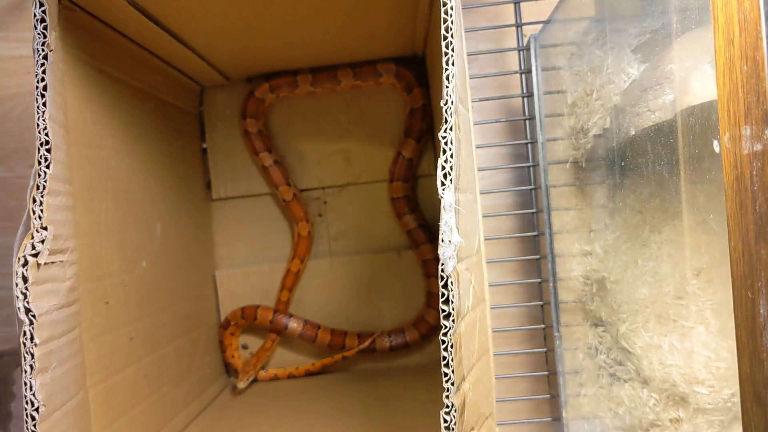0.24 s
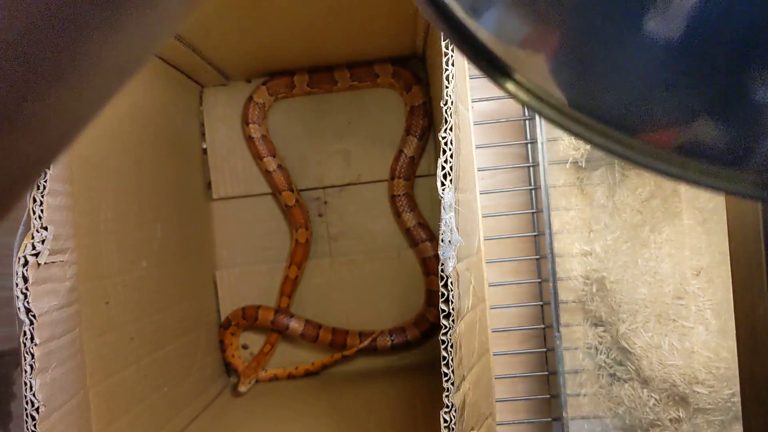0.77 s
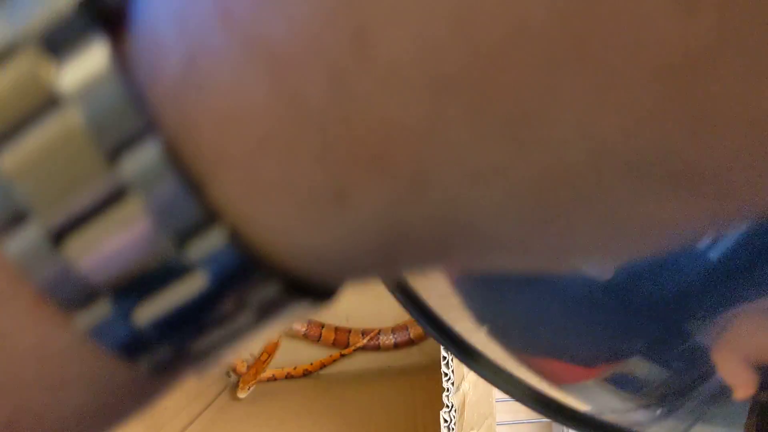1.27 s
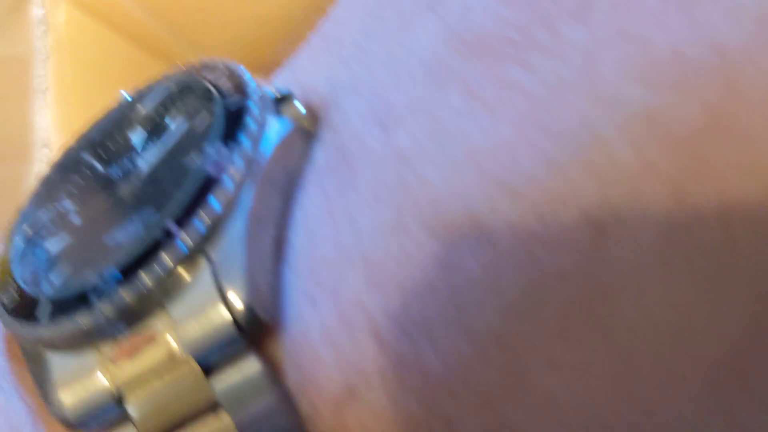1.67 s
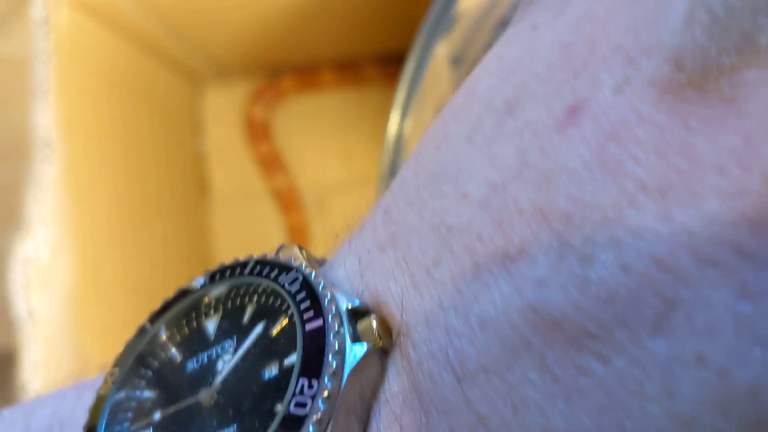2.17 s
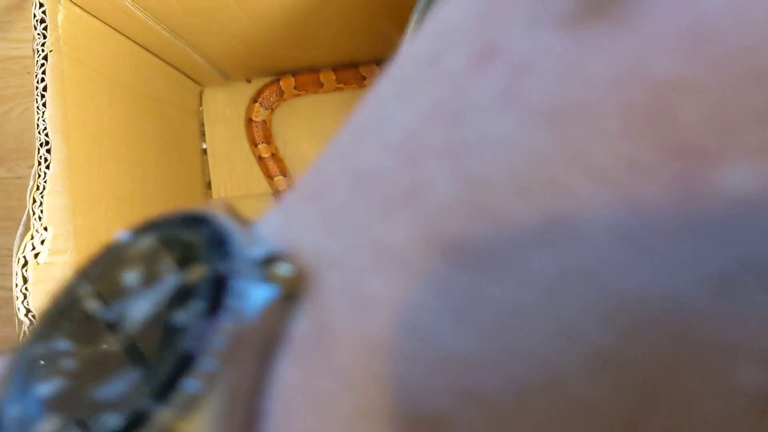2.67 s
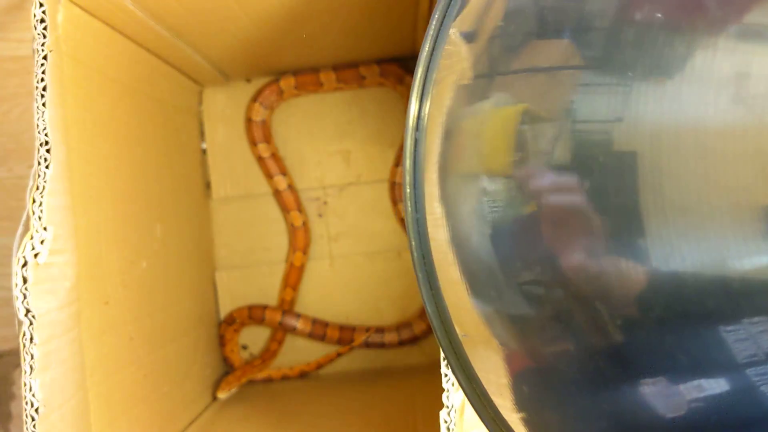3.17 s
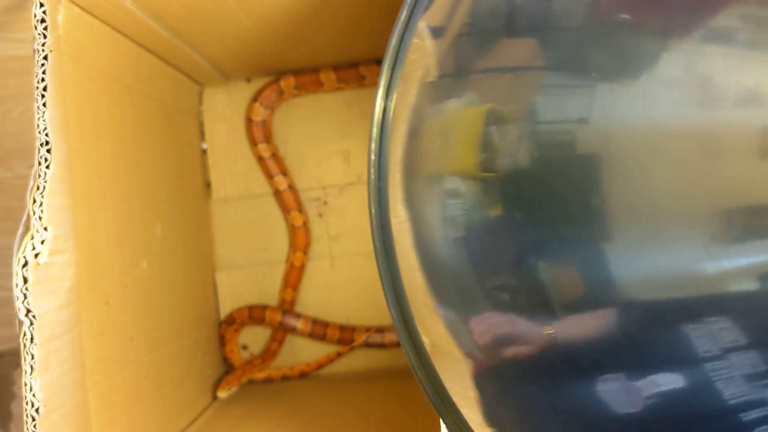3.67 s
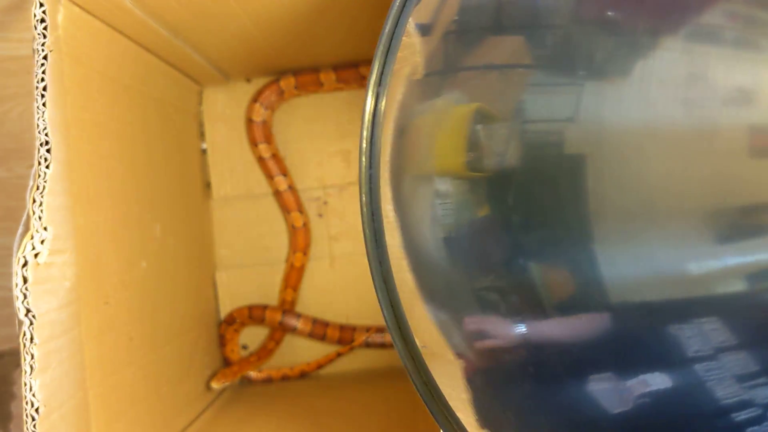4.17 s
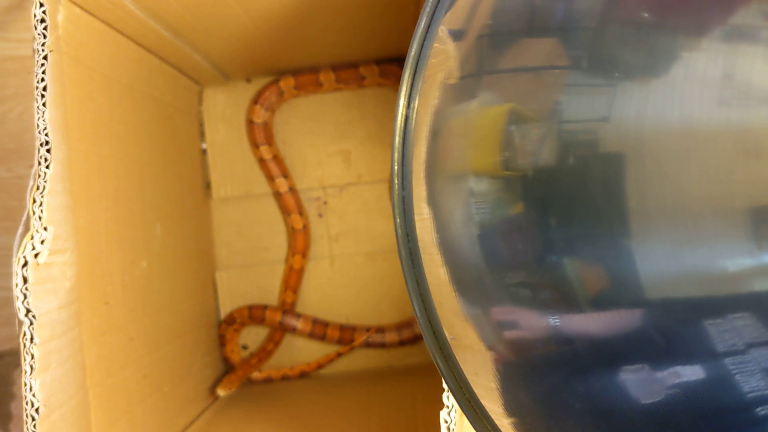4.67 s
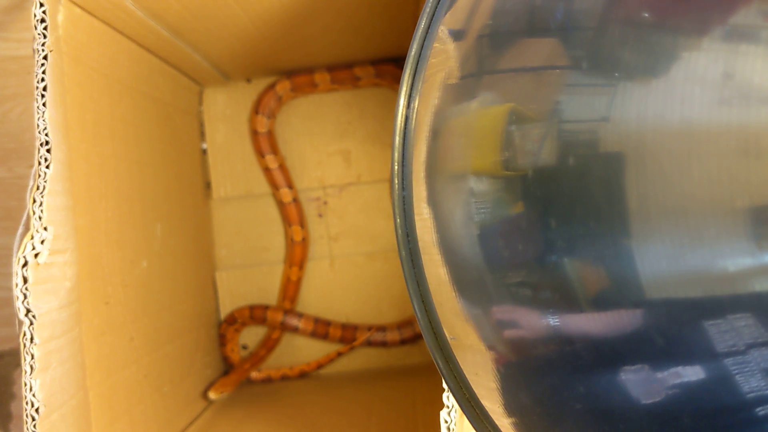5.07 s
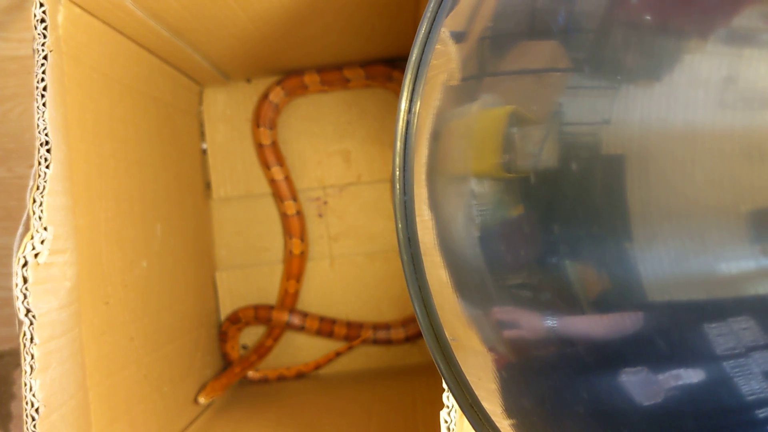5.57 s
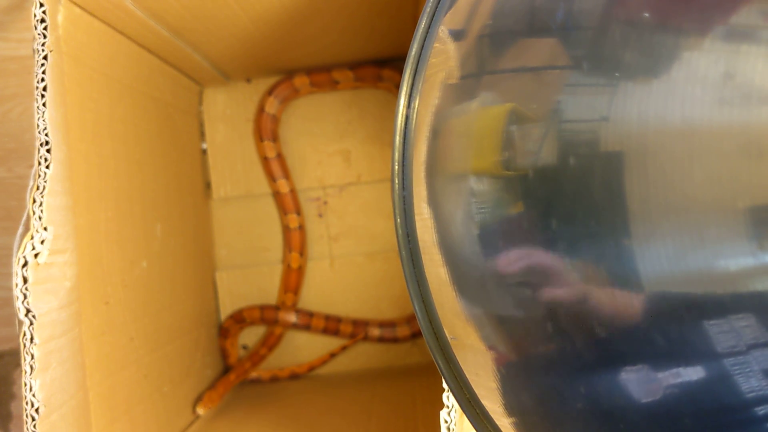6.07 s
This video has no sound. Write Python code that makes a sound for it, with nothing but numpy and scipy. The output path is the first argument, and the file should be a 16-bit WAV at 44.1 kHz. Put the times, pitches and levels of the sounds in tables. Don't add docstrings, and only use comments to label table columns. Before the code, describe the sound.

Stereo close microphone, short boxy echo, faint room noise. Busy, uneven scratching on metal mixes with soft thuds on cardboard and thin, partly hoarse rodent squeaks. A loud blow with clatter comes early, a second sharp one soon after, then a faint bump. The squeaking stops; scattered knocks and rubs thin almost to quiet before a few final scuffs and another cluster of squeaks.

```python
import sys
import numpy as np
from scipy import signal
from scipy.fft import rfft, irfft, next_fast_len
from scipy.io import wavfile

SR = 44100
rng = np.random.default_rng(int(sys.argv[2]) if len(sys.argv) > 2 else 0)


def store_wav(level_fs):
    pcm = np.round(np.clip(np.atleast_2d(level_fs), -1, 1) * 32767)
    wavfile.write(sys.argv[1], SR, pcm.T.astype(np.int16))


def ratio_of_db(decibels):
    return 10 ** (np.asarray(decibels, float) / 20)


N = 279153
T = np.arange(N) / SR

# (frequency [Hz], density [dB per Hz])
ROOM_SPECTRUM = [(15, -63), (30, -25.5), (60, -0.5), (130, 10), (249, -11.5), (344, -8.5), (560, -17),
                 (988, -25), (1400, -8.5), (1520, -15), (4490, -13), (9000, -30.5), (16000, -28)]
ROOM_DB = -60
# (frequency [Hz], density [dB per Hz])
BOOM_SPECTRUM = [(15, -69.5), (25, -44), (64, -10), (97, -9.5), (150, -9), (369, -25), (420, -14),
                 (550, -27), (920, -120)]
# (frequency [Hz], density [dB per Hz])
RUSTLE_SPECTRUM = [(160, -25), (280, -15), (379, -15), (549, -12.5), (885, -6), (1250, -15), (1530, -15),
                   (4500, -32), (5850, -75), (9900, -120)]
# (frequency [Hz], density [dB per Hz])
HISS_SPECTRUM = [(1180, -16), (2000, 2.5), (2280, -1), (2620, -5), (4230, -4.5), (5780, -7.5), (6530, -8),
                 (7250, -5.5), (8800, -12), (11200, -16), (15100, -22), (16000, -30.5)]
# (frequency [Hz], correlation [-1 to 1])
LIKENESS = [(60, 0.82), (200, 0.96), (600, 0.65), (1600, 0.14), (5000, 0.052), (15000, 0.099)]
# (frequency [Hz], left minus right [dB])
LEAN = [(60, 5), (180, 2.5), (550, 2), (1650, 1), (4970, 0), (15000, 14.5)]
RIGHT_LAG_S = .00011

# (time [s], held [s], effort [dB], weight on the box [dB], claws out [dB])
BOUTS = [(0.016, 0.03, -36, 1, -18.5), (.14, 0.22, -53.5, 0, -15), (0.33, 0.031, -41.5, 1.5, -19.5),
         (.44, 0.2, -56.5, 16.5, -15), (.66, 0.25, -54.5, 7.5, -11), (.98, 0.027, -43.5, 4, -14),
         (1.073, 0.038, -38.5, 10, -20), (1.346, 0.0039, -51, 17, 4.5), (1.52, .45, -37, -4.5, -17),
         (2.019, 0.038, -27.5, -8.5, -27), (2.171, 0.11, -40, -7, -15.5), (2.33, 0.05, -45, -1.5, -15),
         (2.523, 0.34, -44.5, -1, -17.5), (2.76, 0.04, -54, -7, -5.5), (2.86, 0.015, -40, 5.5, -48),
         (3.022, 0.074, -42.5, 0, -19.5), (3.16, .12, -57.5, 10, -15.5), (3.461, 0.13, -49, -4.5, -19),
         (3.566, 0.072, -47.5, -1.5, -16), (3.761, 0.078, -43, -1.5, -16), (4.198, 0.077, -53, 4.5, -17),
         (4.27, .02, -48, 1, -19.5), (4.33, 0.059, -45.5, -2.5, -15), (4.45, 0.076, -59, 6.5, -18.5),
         (4.58, .04, -50.5, -5, -18), (4.645, 0.025, -46, 6.5, -24), (5.329, 0.014, -64.5, -5, -11),
         (5.855, 0.038, -44, 5.5, -36.5), (5.98, 0.31, -70, 10, -8)]
BUILD_DB_PER_S, SUDDEN_S = 159, 0.05
BOOM_FADE_DB_PER_S, RUSTLE_FADE_DB_PER_S, HISS_FADE_DB_PER_S = 89, 128, 228
REST_DB = [-59.5, -66.5, -82]
# (frequency [Hz], width [Hz], level [dB])
BODY_RINGS = [(156, 1.3, -2), (221.5, 85.4, 5), (330, 3.4, 3.5), (537.5, 77, 7.5), (629, 25, 2),
              (1025, 14, 1), (1240, 127, 3), (1374, 19, -0.5), (2300, 34, 3)]
# (frequency [Hz], width [Hz], level [dB])
STEEL_SHEEN = [(2300, 200, -5.5), (6600, 300, -4), (7150, 350, 2.5), (8600, 600, -2.5), (9370, 300, 0.5)]

# (time [s], length [s], frequency [Hz], width [Hz], level [dB])
RUBS = [(0.573, 0.04, 2280, 300, -52.5), (1.501, 0.19, 1215, 290, -48), (1.759, 0.068, 564, 86, -46.5),
        (2.247, 0.042, 2490, 280, -49.5), (2.524, 0.39, 1346, 180, -55.5), (3.502, 0.56, 330, 27.8, -55),
        (2.9, 0.095, 565, 190, -59), (3.62, 0.17, 522, 56, -54.5), (3.738, 0.15, 538, 193, -42),
        (3.741, 0.035, 2250, 170, -66), (3.565, 0.021, 1240, 120, -56), (3.07, 0.041, 600, 160, -48.5),
        (4.19, 0.035, 627, 90, -57.5), (4.244, 0.037, 617, 90, -47.5), (4.569, 0.059, 620, 140, -55),
        (4.83, 0.14, 4630, 650, -69.5), (5.71, 0.053, 3200, 740, -53), (5.823, 0.073, 2590, 300, -76),
        (6.142, 0.052, 256, 40, -55.5), (.16, 0.13, 2280, 250, -62.5), (0.651, 0.24, 2350, 160, -68.5),
        (3.951, 0.14, 380, 250, -63.5), (5.997, 0.19, 640, 530, -76.5), (6.056, 0.035, 2490, 250, -63.5),
        (6.157, 0.04, 2506, 168, -64), (5.498, 0.022, 480, 100, -64), (5.598, 0.025, 540, 120, -70)]
# (time [s], peak [dB], t60 [s], low edge [Hz], high edge [Hz])
SCRATCHES = [(1.076, -35, 0.17, 8900, 15500), (2.4, -17, 0.01, 6300, 8800), (3.1, -44, .08, 10500, 19000),
             (2.997, -58, 0.12, 4100, 7000), (2.6, -35, 0.14, 5000, 9000), (2.5, -43, .2, 11500, 17000),
             (5.83, -50, 0.22, 12400, 13600), (2.53, -44, .1, 12400, 15000), (.01, -44, .1, 2500, 7600),
             (2.48, -48, .04, 14500, 15800), (6.145, -42, .12, 10500, 13000),
             (6.045, -48, .12, 10800, 12500), (5.68, -37, 0.077, 740, 1600), (5.82, -54, .12, 3800, 6000),
             (5.72, -54, .12, 3500, 6000), (0.52, -46, .1, 2300, 4200), (1.33, -41, .06, 1800, 4000),
             (1.36, -41.5, 0.054, 1500, 3500)]
# (time [s], peak [dB], t60 [s])
TICKS = [(1.074, -23, 0.45), (1.2211, -37, 0.062), (1.324, -26, 0.043), (1.3426, -4, 0.031),
         (1.344, -26, 0.072), (1.359, -36, 0.04), (2.001, -3, 0.032), (2.444, -24, .03),
         (2.455, -29, 0.027), (3.039, -25.5, 0.13), (3.568, -33, .14), (3.786, -32, 0.2),
         (4.639, -27.5, 0.079), (4.7351, -36, 0.056), (5.5766, -43.5, 0.081), (5.716, -36.5, 0.26),
         (6.322, -40, 0.058), (.01, -27, 0.074), (0.348, -40, .04), (.38, -40, .04), (.4, -37, .03),
         (5.321, -50, .06)]
# (time [s], peak [dB], knock
# [Hz], thud [dB])
KNOCKS = [(0.004, -21.5, 553, -36.5), (0.347, -23.5, 676, -58), (0.379, -26, 560, -59),
          (0.743, -33, 460, -44), (0.971, -29.5, 590, -51), (1.068, -24, 635, -35.5),
          (1.323, -32, 1520, -46.5), (1.341, -25, 750, -60), (1.358, -22.5, 710, -62),
          (1.918, -25.5, 490, -51), (1.995, -16, 570, -42), (3.011, -27.5, 580, -47.5),
          (3.041, -30, 596, -51), (1.465, -22.5, 1300, -60), (1.497, -26.5, 1240, -60),
          (2.896, -35.5, 560, -55), (3.745, -39, 557, -58), (3.795, -36, 528, -44), (3.815, -35, 530, -48),
          (4.194, -47, 614, -59), (4.251, -46, 620, -56), (4.341, -35.5, 637, -66), (4.566, -43, 624, -65),
          (.309, -39, 750, -70), (.4, -40, 560, -66), (2.393, -39.5, 660, -60), (2.547, -33.5, 624, -70),
          (6.322, -51, 497, -46), (4.639, -28.5, 487, -43.5), (5.321, -43, 565, -50.5),
          (5.511, -51, 470, -64.5), (5.678, -33, 570, -38), (5.818, -23.5, 510, -41.5),
          (5.835, -26, 513, -46)]
THUD_HZ, THUD_PEAK_S, REBOUND_S, REBOUND_DB = 242, .013, .04, -12.5

# (time [s], rise [s], frequency [Hz], level [dB], t60 [s])
SWELLS = [
    (1.076, 0.011, 184.5, -26.5, 0.16),
    (1.097, 0.03, 156, -18, 0.29),
    (1.341, 0.016, 175.8, -26, 0.14),
    (1.348, 0.021, 76, -40, 0.55),
    (1.513, 0.017, 135.6, -37, 0.12),
    (1.86, 0.04, 145, -34.5, 0.19),
]
# (time [s], peak [dB], crack [dB], clatter [dB], clatter t60 [s])
BUMPS = [
    (1.4497, -7.5, -8.5, -25.5, 0.27),
    (2.0055, -13.5, -8, -21.5, 0.14),
    (2.838, -29, -30.5, -32, 0.039),
]
LEAD_IN_S = [0.0019, 0.0035, 0.001]
SNAPS_DB = [-22, -10, -34]
BOWL_HZ = [190, 250, 435, 536, 577, 730, 850, 1010, 1235, 1370, 1750]
# (t60 [s], level in first, second, third bump [dB])
BOWL_MODES = [(0.6, -27.5, -27.5, -13), (0.11, -27, -23, -3), (0.05, -38, -15, -22), (0.15, -4, -9, -2),
              (0.14, -5.5, -13, -10), (0.097, -20, -10, -2), (0.12, -23, -24, -17), (0.24, -25.5, -13, -24),
              (0.071, -14.5, -18.5, -6), (0.046, -13.5, -9, -1.5), (0.016, -14.5, -13.5, -15)]
# (time [s], left minus right [dB])
PLACE = [(0, 5), (.5, 1.5), (1.1, 5), (1.45, 4), (1.9, 5), (2.0, 0), (2.3, 0), (2.84, 2), (3.8, 4.5),
         (4.6, 0.5), (5.7, -0.5), (6.3, -0.5)]

# (time [s], length [s], pitch [Hz], 3rd harmonic [dB], 4th harmonic [dB])
CLEAR_SQUEAKS = [(0.571, 0.054, 2610, -45, -44), (0.585, 0.025, 2440, -37, -40),
                 (0.644, 0.028, 2356, -71, -35.5), (0.937, 0.024, 2300, -81, -38.5),
                 (1.45, 0.025, 2495, -35, -65), (1.479, 0.021, 2420, -28.5, -54),
                 (0.637, 0.09, 2585, -62, -48), (5.94, .05, 2660, -70, -48),
                 (1.504, 0.07, 2614, -45, -33.5), (1.558, .09, 2670, -42, -60),
                 (1.612, 0.024, 2616, -55, -39), (1.658, 0.016, 2208, -26, -24.5),
                 (1.79, 0.022, 2053, -36, -57), (1.804, 0.03, 2636, -53, -29),
                 (2.254, 0.017, 2640, -25, -64), (2.242, 0.026, 2602, -58, -27.5),
                 (2.276, 0.034, 2620, -53, -36), (2.349, 0.028, 2630, -64, -33),
                 (2.392, 0.045, 2630, -67, -53), (2.428, 0.026, 2380, -76, -22.5),
                 (2.465, 0.025, 2375, -79, -42), (2.523, 0.045, 2160, -34.5, -47),
                 (2.594, 0.015, 2326, -63, -29), (2.738, 0.046, 2620, -55, -46.5),
                 (2.576, .008, 2215, -72.5, -41), (0.845, 0.012, 2285, -70, -36.5),
                 (6.073, .012, 2197, -60, -37.5), (3.571, 0.027, 1238, -47, -85),
                 (5.797, 0.052, 2617, -33, -48), (5.846, 0.062, 2600, -47, -27.5),
                 (5.925, 0.022, 2375, -77, -29), (5.984, 0.025, 2157, -68, -27.5),
                 (6.063, .015, 2230, -58, -38), (6.173, 0.03, 2652, -62.5, -36.5),
                 (2.588, 0.016, 2310, -46, -60), (2.7, .03, 2064, -43, -70)]
# (time [s], length [s], pitch [Hz], 3rd harmonic [dB], 4th harmonic [dB])
ROUGH_SQUEAKS = [(0.057, 0.012, 2023, -27.5, -84), (0.593, 0.0084, 1703, -28, -77),
                 (0.7, 0.14, 2600, -42, -68.5), (0.761, 0.035, 2130, -65, -42),
                 (1.73, 0.042, 2550, -44, -70), (2.459, 0.034, 2150, -67, -41.5),
                 (2.48, 0.029, 2652, -45, -73), (0.559, 0.039, 2575, -33.5, -57),
                 (.651, 0.042, 2570, -69, -38.5), (.73, 0.024, 2230, -31, -69),
                 (0.803, 0.035, 2340, -68, -28), (0.905, 0.025, 1967, -38.5, -73),
                 (1.505, 0.048, 2590, -34, -54.5), (1.686, 0.044, 1945, -30.5, -68),
                 (2.51, 0.045, 1930, -42, -57), (2.625, 0.035, 2360, -62, -46),
                 (2.697, 0.014, 2040, -30.5, -76), (5.999, 0.028, 2610, -36, -55),
                 (6.021, 0.047, 1950, -35.5, -58), (6.072, 0.029, 2300, -51.5, -36),
                 (6.138, 0.036, 2000, -37, -68.5), (6.01, 0.045, 2170, -41, -60),
                 (6.158, 0.03, 2265, -53, -36.5)]
# (frequency [Hz], level [dB])
SIXTH = [(11000, -8), (11800, -11.5), (13000, -29.5), (14500, 5.5), (15800, -8.5)]
# (time [s], length [s], mouth resonance [Hz], mouth [dB], top [dB])
RASPS = [(0.576, 0.027, 8080, -39, -41.5), (0.621, 0.068, 9500, -48.5, -68), (0.73, 0.076, 7530, -38, -42),
         (1.526, 0.051, 8000, -39, -61), (1.67, 0.096, 7430, -35.5, -41), (2.252, 0.07, 8030, -67, -59),
         (2.477, 0.055, 8240, -54, -71), (2.526, 0.041, 11350, -61, -54), (1.561, 0.12, 7880, -40, -69),
         (1.77, 0.22, 7550, -37.5, -58.5), (2.573, 0.136, 8600, -46, -61.5),
         (5.716, 0.13, 8200, -53.5, -56), (5.816, 0.045, 7840, -48, -59.5), (5.928, 0.023, 9000, -54, -70),
         (6.014, 0.066, 7350, -42.5, -54), (6.129, 0.05, 7400, -49, -58)]
# (frequency [Hz], width [Hz], depth [0 to 1])
PORT_DIPS = [
    (5700, 1500, 1),
    (9560, 950, 1),
]


def rms_one(x):
    return x / np.sqrt(np.mean(x ** 2) + 1e-20)


def at_hz(points, hz):
    known_hz, values = np.transpose(points)
    return np.interp(np.log(hz), np.log(known_hz), values)


def band(x, low_hz, high_hz):
    edges = [low_hz, min(high_hz, .45 * SR)]
    return signal.sosfilt(signal.butter(2, edges, "band", fs=SR, output="sos"), x)


def resonate(x, hz, width_hz):
    r = np.exp(-np.pi * width_hz / SR)
    zeros = np.array([1, 0, -1]) * (1 - r * r) / 2
    return signal.lfilter(zeros, [1, -2 * r * np.cos(2 * np.pi * hz / SR), r * r], x)


def drift(rate, size=N):
    steps = rng.standard_normal(int(N * 40 / SR) + 400)
    return np.interp(np.arange(size) * rate / SR, np.arange(len(steps)), steps)


def add(out, x, s):
    i = round(s * SR)
    out[..., i:i + x.shape[-1]] += x[..., :N - i]


def dying(t, t60):
    return ratio_of_db(-60 * t / t60)


def spread(spectrum, grains_per_s=0., grain_db=0., share=0.):
    white = rng.standard_normal((2, N))
    sizes = ratio_of_db(grain_db * np.minimum(rng.exponential(1, N), 4)) * rng.choice([-1, 1], N)
    hits = sizes ** 2 * (rng.random(N) < grains_per_s / SR)
    contacts = rms_one(signal.lfilter([1], [1, -.97], hits) ** .5)
    size = next_fast_len(N)
    hz = np.maximum(np.arange(size // 2 + 1) * SR / size, 1)
    mid, side = rfft(white * (1 + share * contacts), size) * ratio_of_db(at_hz(spectrum, hz))
    alike, lean = at_hz(LIKENESS, hz), ratio_of_db(at_hz(LEAN, hz) / 2)
    pair = np.sqrt(1 + alike) * mid + np.sqrt(1 - alike) * side * [[1], [-1]]
    late = np.exp(-2j * np.pi * hz * RIGHT_LAG_S)
    return rms_one(irfft(pair * [lean, late / lean], size)[:, :N])


def room_floor():
    return ratio_of_db(ROOM_DB) * spread(ROOM_SPECTRUM)


def box_echo(x, t60, wet_db, shared):
    t = T[:SR // 3]
    own, common = rng.standard_normal((2, len(t))), rng.standard_normal(len(t))
    tail = (own + shared * common) * dying(t, t60) * (t > .004)
    tail = tail / np.sqrt((tail ** 2).sum(axis=1, keepdims=True))
    return ratio_of_db(wet_db) * signal.fftconvolve(x[None], tail, axes=1)[:, :N]


def stirring(extra_db, fade_db_per_s, rest_db):
    s, held, effort_db = np.transpose(BOUTS)[:3, :, None]
    t = T[::32]
    build = BUILD_DB_PER_S * (1 + SUDDEN_S / np.maximum(held, .005))
    loss = build * np.maximum(s - t, 0) + fade_db_per_s * np.maximum(t - s - held, 0)
    bouts = ratio_of_db(2 * (effort_db + extra_db[:, None] - loss))
    return np.interp(T, t, np.sqrt(ratio_of_db(2 * rest_db) + bouts.sum(axis=0)))


def scrabbling():
    *_, weight_db, claws_db = np.transpose(BOUTS)
    boom = stirring(weight_db, BOOM_FADE_DB_PER_S, REST_DB[0])
    boom = boom * ratio_of_db(-3.5 + 2.0 * drift(25)) * spread(BOOM_SPECTRUM)
    rustle = stirring(0 * weight_db, RUSTLE_FADE_DB_PER_S, REST_DB[1])
    rustle = rustle * ratio_of_db(1.5 * drift(30)) * spread(RUSTLE_SPECTRUM, 400., 2., .25)
    body = boom + ratio_of_db(-2.5) * rustle
    rings = sum(ratio_of_db(db + 4 * drift(5)) * resonate(body, hz, w) for hz, w, db in BODY_RINGS)
    hiss = stirring(claws_db, HISS_FADE_DB_PER_S, REST_DB[2])
    hiss = hiss * ratio_of_db(1.5 * drift(20)) * spread(HISS_SPECTRUM, 350., 3., .6)
    sheen = sum(ratio_of_db(db + 3 * drift(9.4)) * resonate(hiss, hz, w) for hz, w, db in STEEL_SHEEN)
    return ratio_of_db(-11.5) * body + ratio_of_db(-1.0) * rings + ratio_of_db(8.5) * (0.77 * hiss + sheen)


def rubs():
    out = np.zeros(N)
    for s, length, hz, width_hz, db in RUBS:
        size = round(length * SR) + 800
        sung = resonate(resonate(rng.standard_normal(size), hz, width_hz), hz, width_hz)
        add(out, ratio_of_db(db) * rms_one(sung) * signal.windows.tukey(size, .6), s)
    return out


def scratches():
    out, t = np.zeros(N), T[:SR // 5]
    for s, db, t60, low_hz, high_hz in SCRATCHES:
        slip = rng.standard_normal(len(t)) * dying(t, t60) * np.minimum(t / .0012, 1)
        add(out, ratio_of_db(db) * band(band(slip, low_hz, high_hz), low_hz, high_hz), s)
    return out


def claw_ticks():
    out, t = np.zeros(N), T[:SR // 5]
    for s, db, t60 in TICKS:
        blow = rng.standard_normal(len(t)) * dying(t, t60)
        add(out, ratio_of_db(db - 18.0) * band(blow, 2100.0, 10500.0), s)
    return out


def soft_knocks():
    out, t = np.zeros(N), T[:SR // 5]
    rise, again = t / THUD_PEAK_S, np.maximum(t - REBOUND_S, 0) / THUD_PEAK_S
    press = (rise * np.exp(1 - rise)) ** 2 - ratio_of_db(REBOUND_DB) * again * np.exp(1 - again)
    thud = np.sin(2 * np.pi * THUD_HZ * t) * press
    for s, db, hz, thud_db in KNOCKS:
        rough = rng.standard_normal(len(t)) * dying(t, 0.097) * np.minimum(t / 0.003, 1)
        push = rough + 1.5 * np.minimum(t / .001, 1) * dying(t, 0.006)
        knock = resonate(push, hz, 140.0) + 0.079 * band(push, 300., 6100.0)
        knock = band(knock, 58.0, 3900.0)
        add(out, ratio_of_db(db - 5.0) * knock / np.abs(knock).max() + ratio_of_db(thud_db + 4.5) * thud, s)
    return out


def wall_swells():
    out, t = np.zeros(N), T[:SR // 2]
    for s, rise, hz, db, t60 in SWELLS:
        swell = np.sin(np.pi / 2 * np.minimum(t / rise, 1)) ** 2
        fade = dying(np.maximum(t - rise, 0), t60)
        add(out, ratio_of_db(db) * np.sin(2 * np.pi * hz * t) * swell * fade, s)
    return out


def bowl_bumps():
    out, since = np.zeros(N), T[:SR // 2] - .02
    late = np.maximum(since, 0)
    phases = rng.uniform(-.7, .7, (len(BUMPS), len(BOWL_MODES)))
    for k, (s, db, crack_db, clatter_db, t60) in enumerate(BUMPS):
        noise = rng.standard_normal(len(since))
        swell = np.exp(np.minimum(since, 0) / LEAD_IN_S[k])
        rings = 0
        for hz, mode, phase in zip(BOWL_HZ, BOWL_MODES, phases[k]):
            ring = ratio_of_db(mode[1 + k]) * np.cos(2 * np.pi * hz * since + phase) * dying(late, mode[0])
            flutter_db = 4.9 * (hz > 600) * np.minimum(late / 0.014, 1)
            rings = rings + ring * ratio_of_db(flutter_db * drift(70., size=len(since)))
        crack = band(noise * (since > 0) * dying(late, 0.024), 3500.0, 7400.0)
        clatter = band(noise * swell * dying(late, t60), 130.0, 2400.0)
        snap = band(np.exp(-(since / 0.0001) ** 2), 120., 4000.)
        blow = ratio_of_db(SNAPS_DB[k] + 3) * snap + ratio_of_db(db) * swell * rings
        add(out, blow + ratio_of_db(crack_db) * crack + ratio_of_db(clatter_db + 8) * clatter, s - .02)
    return out


def breath_shape(t, length):
    held = dying(np.minimum(t, length), 0.56)
    return np.minimum(t / 0.009, 1) * dying(np.maximum(t - length, 0), 0.054) * held


def squeak(row, jitter, scoop):
    _, length, hz, third_db, fourth_db = row
    sixth_db = third_db + at_hz(SIXTH, hz * 6)
    t = T[:SR // 5]
    waver = 1 + 0.0034 * drift(60., size=len(t)) + jitter * drift(840.0, size=len(t))
    waver = waver - scoop * np.exp(-t / 0.012)
    phase = 2 * np.pi * np.cumsum(hz * waver) / SR
    fifth_db = max(fourth_db, sixth_db) - 37.5
    levels_db = [third_db - 28.0, third_db - 26.0, third_db, fourth_db, fifth_db, sixth_db]
    voice = 0
    for k, db in enumerate(levels_db, 1):
        flutter_db = 5.2 * drift(90., size=len(t)) + 1.4 * drift(300., size=len(t))
        voice = voice + ratio_of_db(db - 5.0 + flutter_db) * np.sin(k * phase)
    return voice * breath_shape(t, length)


def rasp(length, hz, db, top_db):
    t = T[:SR // 5]
    noise = rng.standard_normal(len(t)) * ratio_of_db(4.6 * drift(150., size=len(t)))
    mouth = band(band(noise, hz * 0.74, hz * 1.22), hz * 0.74, hz * 1.22)
    mouth = mouth + 1.3 * sum(resonate(mouth, hz * f, 120.) for f in rng.uniform(.75, 1.2, 4))
    top = band(band(noise, 11990.0, 17500.), 12040.0, 17500.)
    return (ratio_of_db(db + 4.0) * mouth + ratio_of_db(top_db + 2.5) * top) * breath_shape(t, length)


def rat():
    out = np.zeros(N)
    for row in CLEAR_SQUEAKS:
        add(out, squeak(row, jitter=.005, scoop=.008), row[0])
    for row in ROUGH_SQUEAKS:
        add(out, squeak(row, jitter=.013, scoop=.035), row[0])
    for s, *settings in RASPS:
        add(out, rasp(*settings), s)
    return out


def ports(x):
    left, right = [x - depth * resonate(x, hz, w) for hz, w, depth in PORT_DIPS]
    return np.array([ratio_of_db(7.0) * left, ratio_of_db(-5.0) * np.roll(right, 3)])


def scene():
    small = soft_knocks() + claw_ticks() + rubs() + scratches()
    bowl, voice = bowl_bumps() + wall_swells(), rat()
    blows = small + bowl
    lean = ratio_of_db(np.interp(T, *np.transpose(PLACE)) / 2)
    right_blows = np.roll(blows, round(RIGHT_LAG_S * SR))
    near = ports(voice) + np.array([ratio_of_db(3.5) * lean * blows, ratio_of_db(2.5) / lean * right_blows])
    echo = box_echo(small + ratio_of_db(-6.0) * bowl, 0.13, -5.0, 1.2) + box_echo(voice, 0.14, -1.5, 0.27)
    return room_floor() + scrabbling() + echo + near


def band_limit(x):
    return signal.sosfilt(signal.butter(12, 16000, fs=SR, output="sos"), x)


def record(dry):
    top_cut = signal.ellip(10, .5, 60, 15850, fs=SR, output="sos")
    mix = signal.sosfilt(top_cut, 1.323 * np.tanh(dry / 1.483))
    return band_limit(mix)


dry = scene()
out = record(dry)
store_wav(out)
```